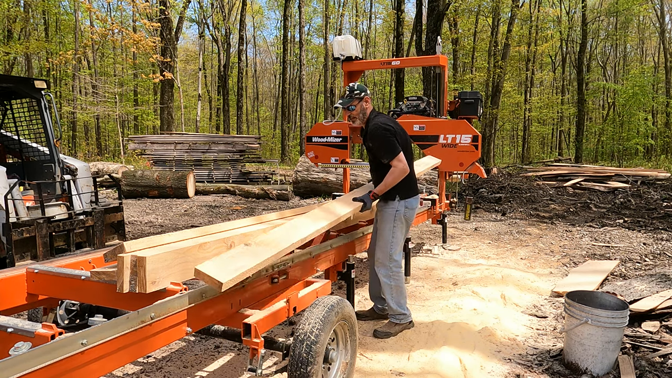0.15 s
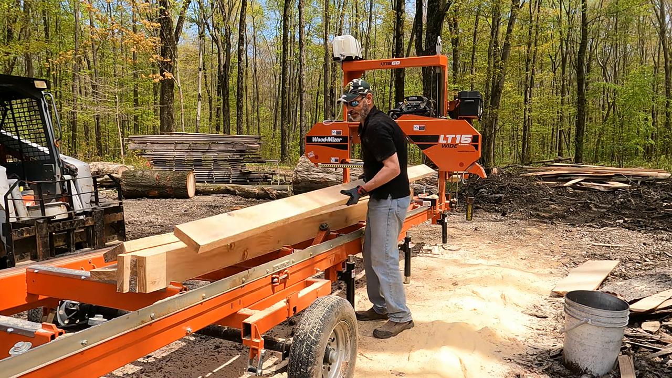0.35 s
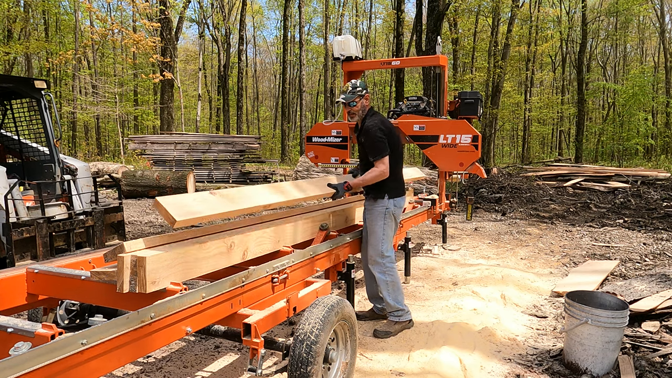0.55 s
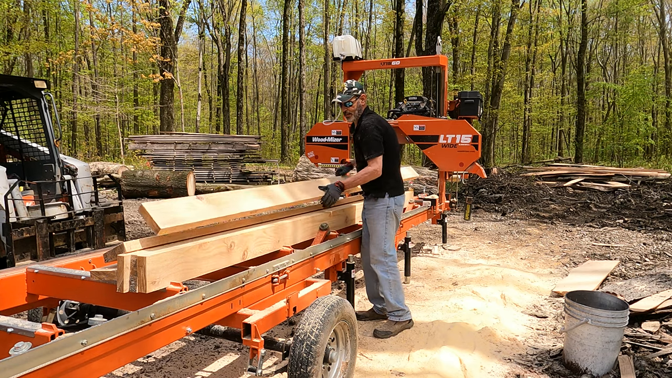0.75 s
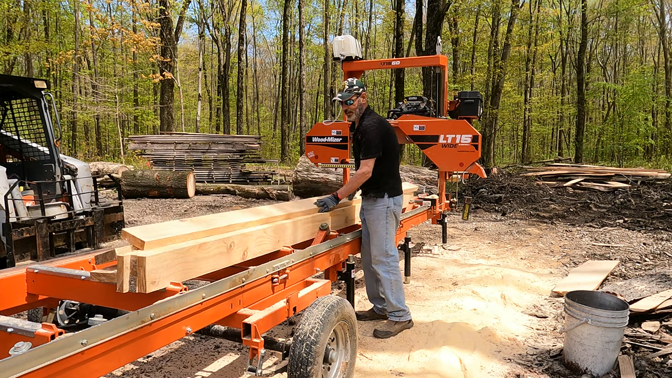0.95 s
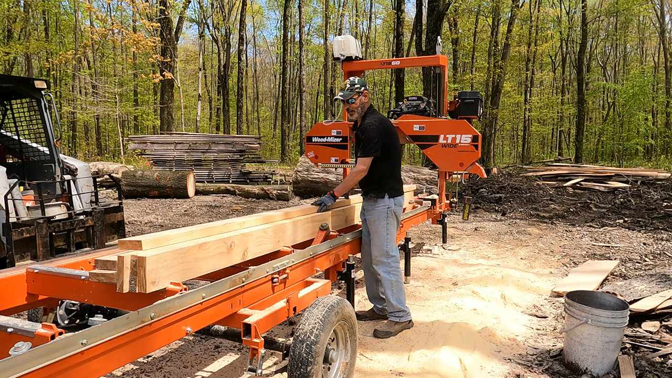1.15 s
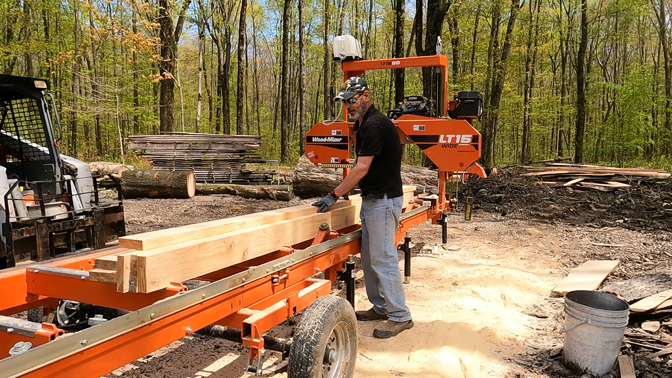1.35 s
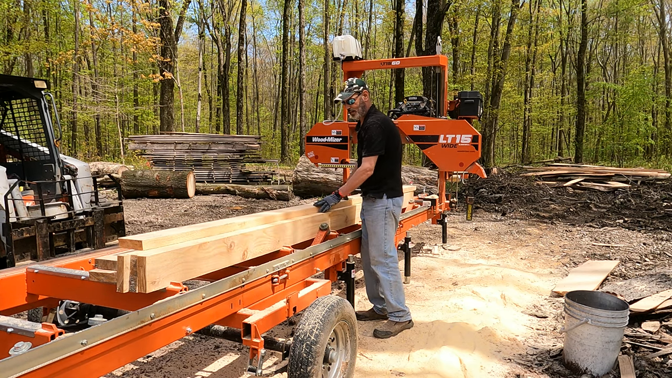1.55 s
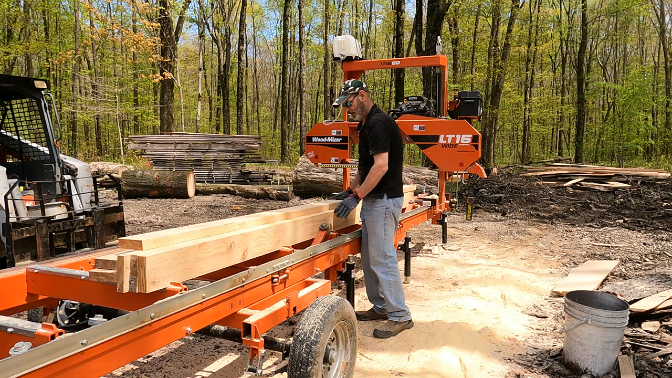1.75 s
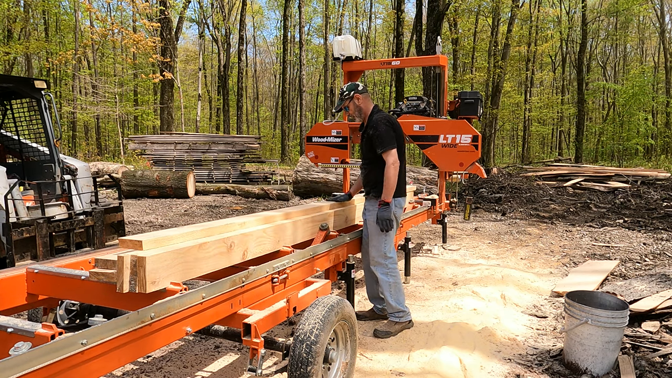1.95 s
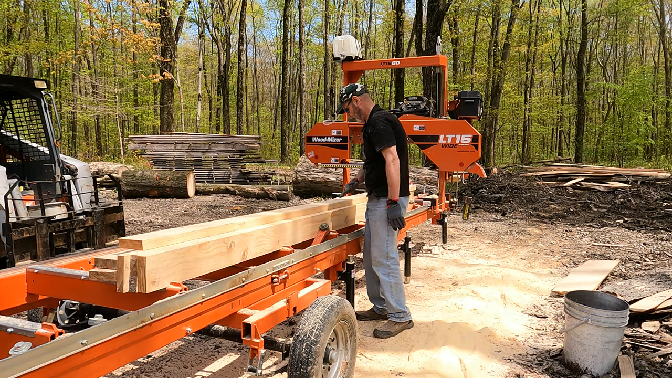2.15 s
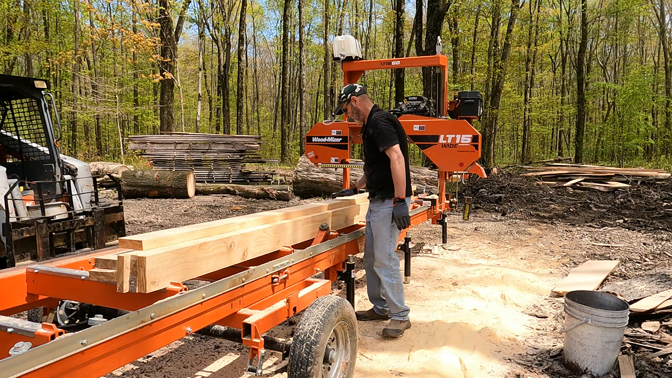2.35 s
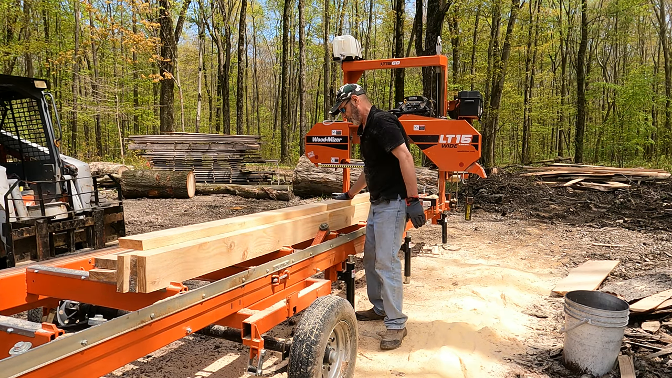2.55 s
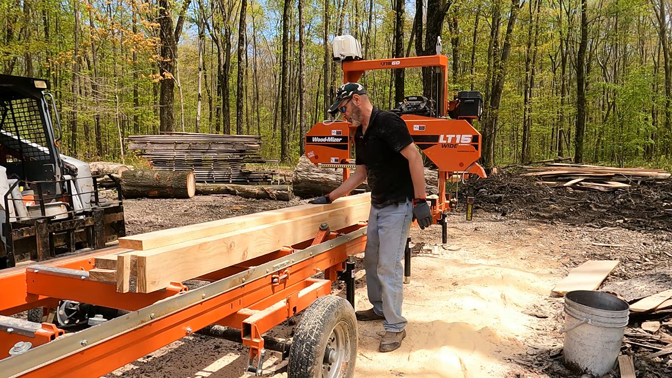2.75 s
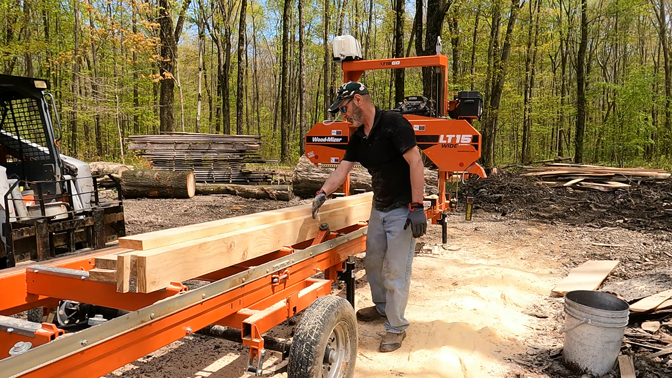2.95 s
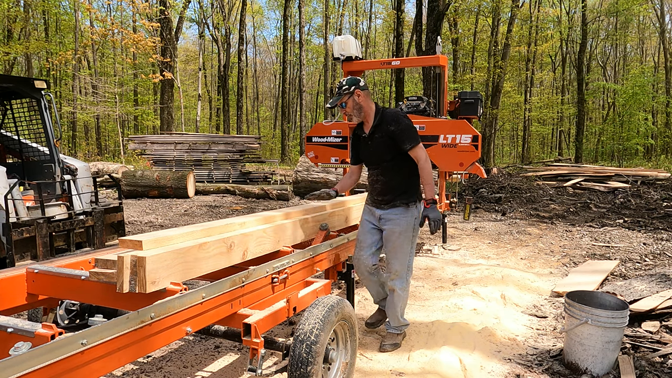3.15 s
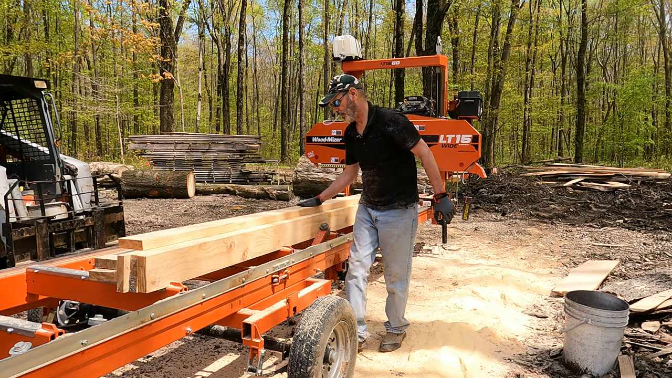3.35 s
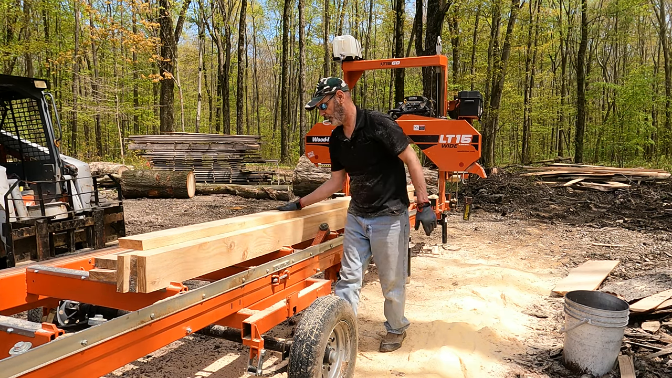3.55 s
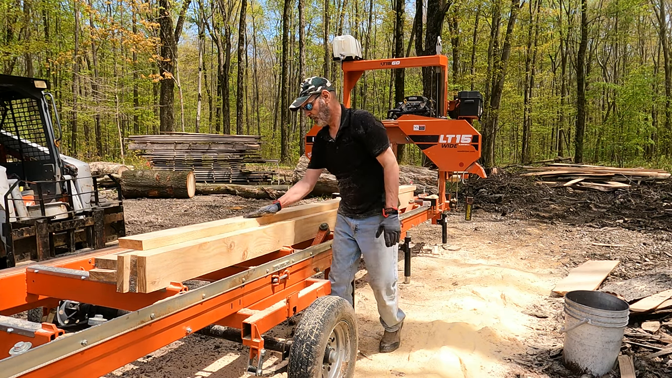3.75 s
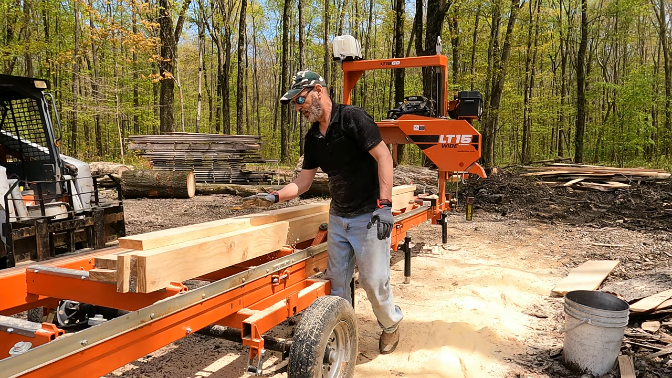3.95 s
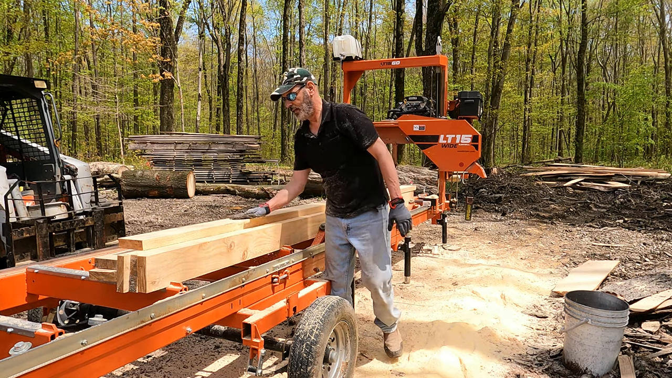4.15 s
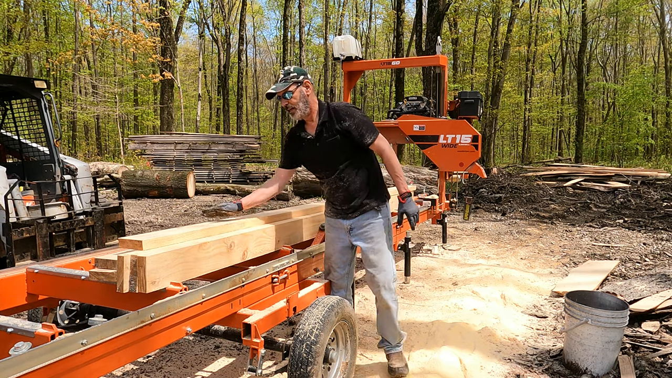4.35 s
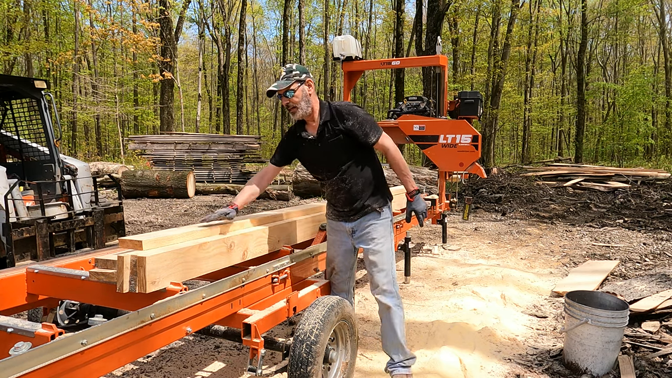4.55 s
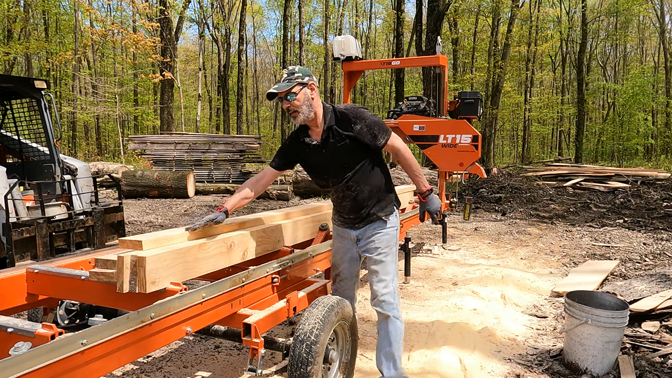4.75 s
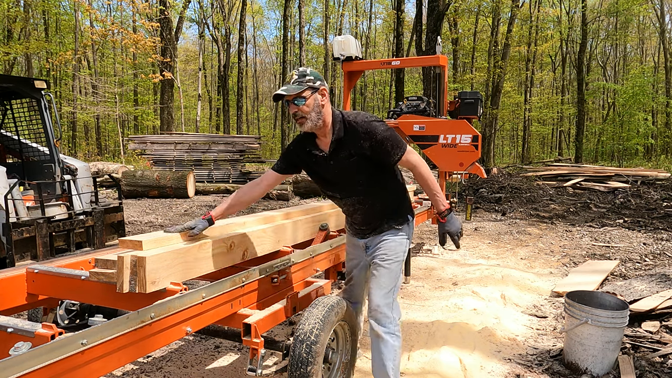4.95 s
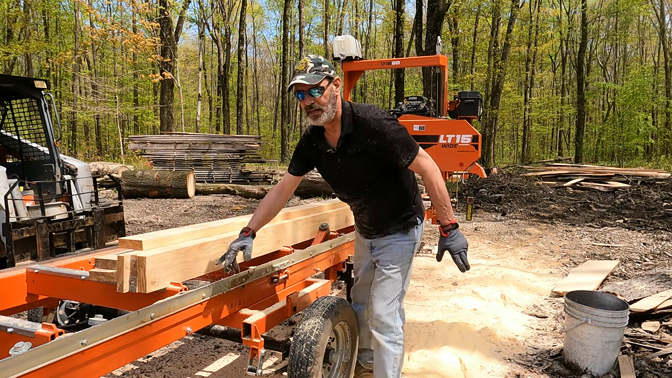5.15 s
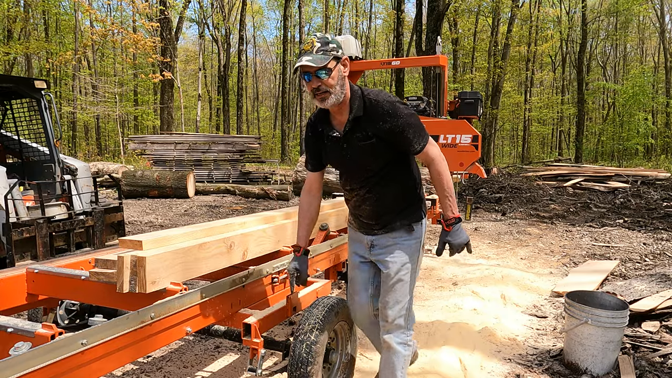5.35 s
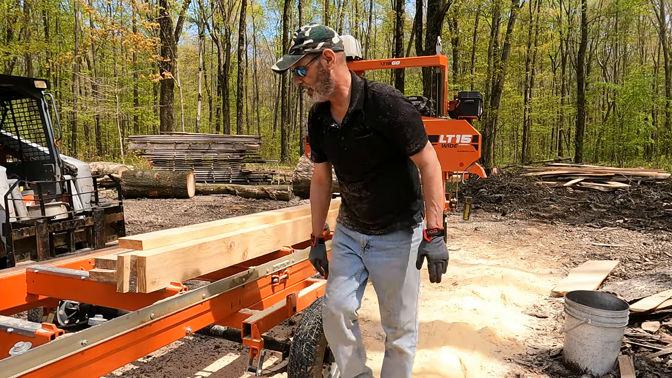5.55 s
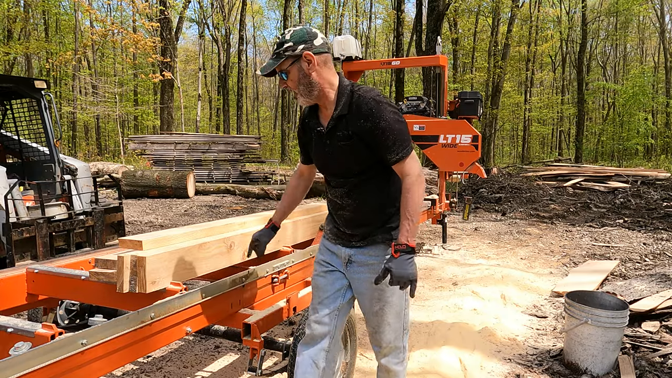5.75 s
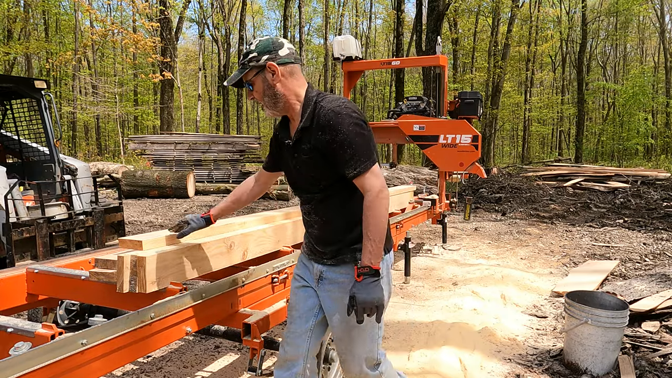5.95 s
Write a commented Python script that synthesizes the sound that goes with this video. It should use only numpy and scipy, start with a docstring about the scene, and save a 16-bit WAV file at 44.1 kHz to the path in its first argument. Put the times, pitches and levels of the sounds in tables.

```python
"""Leaves hiss over a distant rumble and a faint wavering drone, as filtered noise throughout.
A long fresh-sawn board slides through a gloved hand (swelling noise) and drops on a stack on a sawmill bed:
modes ring, wood noise knocks, fittings rattle, trees echo; gain control ducks and recovers slowly.
The glove then sweeps off sawdust in long and short strokes of swelling noise, with a few soft low steps.
Late on, a far tree frog trills once in upward tone slides and the board knocks lightly again."""
import sys
import numpy as np
from scipy import signal
from scipy.fft import rfft, irfft
from scipy.io import wavfile
from scipy.ndimage import uniform_filter1d

SR = 44100
rng = np.random.default_rng(int(sys.argv[2]) if len(sys.argv) > 2 else 0)


def log_audio(samples):
    """Write samples as a 16-bit WAV file to the path given in sys.argv[1]."""
    # one column per channel
    frames = np.atleast_2d(samples).T
    # limit to full scale, then quantise
    limited = np.clip(frames, -1, 1)
    pcm = np.round(limited * 32767).astype(np.int16)
    wavfile.write(sys.argv[1], SR, pcm)


N = 264600
TIME_S = np.arange(N) / SR

# board against stack: start_s, relative_strength_db, lowpass_hz
CONTACTS = [(0.802, -24.5, 810), (0.841, -29.5, 590), (0.929, -5.5, 950), (0.938, -2.5, 1050),
            (0.957, -9.5, 855), (0.9684, -3.5, 5900), (0.9725, 11.5, 750), (0.984, 13, 1485),
            (0.994, -1, 800), (1.007, -1.5, 690), (1.026, 1.5, 750), (1.058, 3, 560), (1.210, -17, 1100),
            (1.273, -7, 890), (1.297, -20, 4800), (1.392, -25, 4000), (4.523, -27.5, 575),
            (5.646, -33, 1500)]
# bending modes of the boards: mode_hz, relative_level_db, t60_s
BOARD_MODES = [(102, -21, .1), (140, -13, .15), (184, -3, .26), (251, -8, .22), (322, -1, .2),
               (395, -9, .12), (420, -5, .16), (487, -3, .15), (520, -8, .14), (576, -6, .22),
               (624, -9, .15), (656, -4, .14), (765, -8, .15), (850, -12, .16), (951, -5, .1),
               (988, 1, .11), (1087, 3, .06), (1195, -8, .1), (1255, -8, .09), (1378, -12, .1),
               (1605, -10, .09)]
# crowded short modes of the wood: band_hz, relative_db_per_hz
WOOD_SPECTRUM = [(40, -34), (100, -14), (200, -7.5), (500, 1.5), (1100, -6.5), (2000, -12.5), (3800, -5.5),
                 (5500, -29.5), (8000, -12.5), (11000, -73), (14000, -50)]
# their decay: band_hz, t60_s
WOOD_T60 = [(100, 0.46), (500, 0.11), (1500, 0.18), (4000, 0.17), (11000, .04)]
# modes of the loose steel fittings: mode_hz, half_width_hz (of each of two cascaded stages), relative_level_db
FITTINGS = [(1600, 220, -25), (1890, 150, 3), (2150, 240, -4), (3540, 110, -12.5), (4000, 110, -16),
            (5260, 97, -22)]
# glove rubbing on the board: first row the board sliding through the hand before it lands, then strokes
# sweeping off sawdust: lift_off_s, swell_s, hold_s, relative_level_db, treble_tilt_db (highs up, lows down),
# palm_hollow_lowest_hz
STROKES = [(0.909, 0.055, 0.035, -58.5, 12.5, 2500), (2.13, 0.13, 0.046, -42, 5, 2400),
           (3.02, 0.41, 0.081, -38, 5.5, 1997), (3.887, 0.21, 0.23, -39.5, 3, 999),
           (4.313, 0.11, 0.051, -43, 5.5, 1900), (4.596, 0.093, 0.025, -42, 5.5, 2000),
           (4.865, 0.06, 0.05, -43, 2.5, 2000), (5.124, 0.065, 0.048, -47, 4.5, 2200),
           (5.362, 0.052, 0.096, -55.5, -4.5, 2200), (5.648, 0.14, 0.004, -46.5, -1.5, 2200)]
# cloth on sawn wood: band_hz, relative_db_per_hz
RUB_SPECTRUM = [(200, -23), (450, 1.5), (800, 2.5), (1400, 2.5), (2200, 1.5), (3400, -1.5), (4800, -9.5),
                (7000, -18), (8500, -30), (10500, -22), (12000, -41), (14000, -54)]
# scuffs of glove and clothes: start_s, relative_level_db, length_s (peak at half)
SCUFFS = [(0.797, -53, 0.0041), (2.525, -53, 0.021), (3.345, -53.5, 0.037), (3.414, -49, 0.026),
          (5.017, -48.5, 0.0096), (5.159, -49, 0.014), (5.284, -56, 0.0104), (5.348, -55, 0.012),
          (5.485, -52.5, 0.018), (5.57, -59, 0.014), (5.638, -51, 0.011)]
# boots on sawdust: start_s, level_db, length_s (peak at half)
STEPS = [(3.1, -50.5, 0.25), (4.52, -41, 0.027), (5.2, -42, 0.015), (5.65, -42.5, 0.024)]
# muffled step: band_hz, relative_db_per_hz
STEP_SPECTRUM = [(40, -37.5), (120, -7.5), (200, -10.5), (350, -25), (700, -53), (2000, -68)]
# echo from yard and trees: band_hz, relative_db_per_hz
FOREST_SPECTRUM = [(60, 14.5), (200, -5.5), (600, -0.5), (1200, -4), (2000, -9), (4000, -2.5), (8000, -8.5),
                   (14000, -39)]
# decay of the trees' answer: band_hz, t60_s
FOREST_T60 = [(100, 0.86), (600, 1.33), (1500, 1.9), (4000, 0.49), (11000, 1.65)]
# leaves and distant rumble: band_hz, relative_db_per_hz
AIR_SPECTRUM = [(20, -39), (35, -23), (55, -9.5), (100, -3.5), (165, -1.5), (230, -6.5), (310, -13.5),
                (500, -13.5), (750, -13.5), (950, -19.5), (1500, -19), (2300, -23), (4000, -35.5),
                (7000, -48), (8500, -58.5), (11000, -54.5), (14000, -76)]

REBOUND_S, REBOUND_LOSS_DB, REBOUND_DULLING = 0.0055, 6.5, 0.63  # second touch: later, softer, duller
LOWEST_HZ = 135  # a narrow board radiates little below this
RATTLE_START_S, RATTLE_DB = 1.032, -34
RATTLE_RISE_S, RATTLE_HOLD_S, RATTLE_FADE_DB_PER_S = 0.055, 0.14, 66  # hold ends this long after the start
LIFT_S, SPEED_POWER, SAG_DB_PER_S = 0.055, 1.48, 13.5  # lift-off time; level against speed; easing pressure
SLOW_DULLING_DB = 3.5  # treble tilt lost as speed nears zero
# palm's hollow: deepest at this share of a rub; rise in octaves per rub length; ceiling of the open hand
CUPPED_AT, CUP_OCTAVES, OPEN_PALM_HZ = 0.62, 3.5, 2500
TRILL_START_S, TRILL_DB = 4.313, -41.5
TRILL_GAP_S, TRILL_SLOWING_S = 0.0455, 0.0013  # first pulse spacing; added to each later one
YARD_T60_S, TREE_RISE_S = 0.24, 0.085
AIR_DB, DRONE_RELATIVE_DB = -46.5, -11.5
RECOVERY_DB_PER_S, CUTOFF_HZ = 6, 14500


def clatter(modes_db=-17.0, crowd_db=16, smack_db=5, smack_top_hz=1700, scatter_db=2,
            grit_db=-20.0, grit_hz=2200, grit_limit_db=-6):
    """Contacts ring the boards: soft, flat landings lack treble, hard edges crack. Gives knock and ring."""
    t, knock, ring = TIME_S[:SR // 2], np.zeros(N), np.zeros(N)
    mode_hz, mode_db, t60_s = np.transpose(BOARD_MODES)
    decays = np.exp(-np.log(1000) * t / t60_s[:, None])
    shapes = np.sin(2 * np.pi * mode_hz[:, None] * t) * decays
    # the sudden stop sends out one sharp pressure pulse
    impulse = (t == 0).astype(float)
    pulse = butter(butter(impulse, smack_top_hz, "low", order=3), 430, "high")
    smack = from_db(smack_db) * pulse
    for start_s, strength_db, lowpass_hz in touches():
        # the place of contact sets each mode's strength and sign
        strengths = from_db(mode_db + scatter_db * rng.standard_normal(len(mode_hz)))
        shares = strengths * rng.choice([-1, 1], len(mode_hz))
        tone = butter(shares @ shapes, lowpass_hz, "low", order=3)
        add(ring, start_s, from_db(strength_db + modes_db) * tone)
        crowd = dying_noise(WOOD_SPECTRUM, WOOD_T60, t)
        # sawn fibres crunch even in soft landings, but no louder once pressed flat
        grit_level_db = grit_db - max(strength_db - grit_limit_db, 0)
        grit = from_db(grit_level_db) * butter(crowd, grit_hz, "high")
        body = butter(smack + crowd, lowpass_hz, "low", order=3)
        add(knock, start_s, from_db(strength_db + crowd_db) * (body + grit))
    return butter([knock, ring], LOWEST_HZ, "high", order=3)


def touches():
    """The springy board touches again after each contact: start_s, strength_db, lowpass_hz."""
    return [(start_s + k * REBOUND_S, db - k * REBOUND_LOSS_DB, hz * REBOUND_DULLING ** k)
            for start_s, db, hz in CONTACTS for k in range(2)]


def rattle(ticks_per_s=1200, uneven_db=1.5):
    """The blow sets the steel bed's clamps chattering: random ticks excite their modes."""
    ticks = (rng.random(N) < ticks_per_s / SR) * rng.standard_normal(N)
    ringing = np.zeros(N)
    for hz, half_width_hz, db in FITTINGS:
        stage = resonance(ticks, hz, 2 * half_width_hz)
        ringing += from_db(db) * resonance(stage, hz, 2 * half_width_hz)
    age_s = TIME_S - RATTLE_START_S
    fade_db = RATTLE_FADE_DB_PER_S * np.maximum(age_s - RATTLE_HOLD_S, 0)
    level_db = RATTLE_DB - fade_db + uneven_db * drift(20)
    return rms_one(ringing) * np.clip(age_s / RATTLE_RISE_S, 0, 1) * from_db(level_db)


def glove(rub_db=2, grains_per_s=3000, grain_share=0.37, catch_db=1.3, hinge_hz=2500, scuff_db=2, palm_db=-7.5):
    """Cloth and sawn fibres rub: fine hiss with sawdust grains, catching a little as it goes."""
    grains = rms_one((rng.random(N) < grains_per_s / SR) * rng.standard_normal(N))
    friction = coloured(rng.standard_normal(N) + grain_share * grains, RUB_SPECTRUM)
    level, tilt_db, palm_hz = hand()
    low = butter(friction, hinge_hz, "low", order=1)
    high = friction - low
    hollow = from_db(palm_db - tilt_db / 2) * palm(palm_hz)
    rub = low * from_db(-tilt_db) + high * from_db(tilt_db) + hollow
    drag = level * from_db(rub_db + catch_db * drift(120))
    return drag * rub + from_db(scuff_db) * puffs(SCUFFS) * friction


def hand():
    """Each rub speeds up, eases and lifts off; faster is louder and brighter. Gives level, tilt_db, palm_hz."""
    level, tilt_db, palm_hz = np.zeros((3, N))
    for lift_s, swell_s, hold_s, db, rub_tilt_db, hollow_hz in STROKES:
        length_s = swell_s + hold_s + LIFT_S
        age_s = TIME_S - (lift_s - hold_s - swell_s)
        on = (age_s > 0) & (age_s < length_s)
        t = age_s[on]
        speed = np.clip(np.minimum(t / swell_s, (length_s - t) / LIFT_S), 0, 1)
        sag_db = SAG_DB_PER_S * np.maximum(t - swell_s, 0)
        level[on] = from_db(db - sag_db) * speed ** SPEED_POWER
        tilt_db[on] = rub_tilt_db - SLOW_DULLING_DB * (1 - speed)
        rise_octaves = CUP_OCTAVES * np.abs(t / length_s - CUPPED_AT)
        palm_hz[on] = np.minimum(hollow_hz * 2 ** rise_octaves, OPEN_PALM_HZ)
    return level, tilt_db, palm_hz


def palm(centre_hz, half_width_hz=380):
    """Noise in a broad resonance that glides as the hand opens and closes."""
    phase = 2 * np.pi * np.cumsum(centre_hz) / SR
    a, b = butter(rng.standard_normal((2, N)), half_width_hz, "low")
    return rms_one(a * np.cos(phase) + b * np.sin(phase))


def boots():
    """Sawdust muffles each step to a low thud."""
    return puffs(STEPS) * coloured(rng.standard_normal(N), STEP_SPECTRUM)


def frog(start_hz=880, end_hz=1100, pulse_s=0.0254, octave_db=-9, rough=0.92, count=9):
    """A trill that slows a little; each pulse slides upward and carries its octave."""
    t, out = TIME_S[:int(pulse_s * SR)], np.zeros(N)
    share = t / pulse_s
    phase = 2 * np.pi * np.cumsum(start_hz + (end_hz - start_hz) * share) / SR
    tone = np.sin(phase) * share + from_db(octave_db) * np.sin(2 * phase)
    pulse = np.sqrt(np.sin(np.pi * share)) * tone
    for k in range(count):
        delay_s = k * TRILL_GAP_S + TRILL_SLOWING_S * k * (k - 1) / 2
        add(out, TRILL_START_S + delay_s, pulse)
    return from_db(TRILL_DB) * out * (1 + rough * drift(300))


def forest(x, yard_db=-17, trees_db=-22):
    """Machines and log piles scatter the sound at once; the trunks answer later and longer."""
    t = TIME_S[:2 * SR]
    yard_t60 = [(100, YARD_T60_S), (10000, YARD_T60_S)]
    yard = dying_noise(FOREST_SPECTRUM, yard_t60, t) * np.minimum(t / 0.0028, 1)
    trees = dying_noise(FOREST_SPECTRUM, FOREST_T60, t) * np.minimum(t / TREE_RISE_S, 1) ** 4
    trees = trees / np.sqrt(np.sum(trees ** 2))
    return signal.fftconvolve(x, from_db(yard_db) * yard + from_db(trees_db) * trees)[:N]


def air(drone_hz=645, stage_width_hz=35):
    """Leaves and far traffic as steady noise; narrow resonant noise makes a faint wavering drone."""
    bed = coloured(rng.standard_normal(N), AIR_SPECTRUM)
    stage = resonance(rng.standard_normal(N), drone_hz, stage_width_hz)
    drone = rms_one(resonance(stage, drone_hz, stage_width_hz))
    return from_db(AIR_DB) * (bed + from_db(DRONE_RELATIVE_DB) * drone)


def from_db(db):
    """Decibels to amplitude."""
    return 10 ** (np.asarray(db) / 20)


def rms_one(x):
    """Scale to rms 1."""
    return x / np.sqrt(np.mean(x ** 2) + 1e-20)


def at_hz(points, hz):
    """Read a table on a log-frequency axis."""
    table_hz, value = np.transpose(points)
    return np.interp(np.log(np.maximum(hz, 1)), np.log(table_hz), value)


def butter(x, hz, kind, order=2):
    """Butterworth low-pass or high-pass."""
    sos = signal.butter(order, np.clip(hz, 10, .45 * SR), kind, fs=SR, output="sos")
    return signal.sosfilt(sos, x)


def coloured(x, spectrum):
    """Give a steady sound a spectrum; rms 1."""
    gain = from_db(at_hz(spectrum, np.fft.rfftfreq(len(x), 1 / SR)))
    return rms_one(irfft(rfft(x) * gain, len(x)))


def drift(knots_per_s):
    """Random values joined by straight lines."""
    knots = rng.standard_normal(4096)
    return np.interp(TIME_S * knots_per_s, np.arange(len(knots)), knots)


def resonance(x, hz, width_hz):
    """One resonant mode."""
    return signal.lfilter(*signal.iirpeak(hz, hz / width_hz, fs=SR), x)


def dying_noise(spectrum, t60s, t):
    """Half-octave bands of noise that each die at their own pace; energy 1."""
    edges_hz, out = 40 * 2 ** np.arange(0, 9, .5), 0
    for low_hz, high_hz in zip(edges_hz, edges_hz[1:]):
        hz = np.sqrt(low_hz * high_hz)
        level_db = at_hz(spectrum, hz) - 60 * t / at_hz(t60s, hz)
        burst = rng.standard_normal(len(t)) * from_db(level_db)
        sos = signal.butter(2, [low_hz, high_hz], "band", fs=SR, output="sos")
        out = out + signal.sosfilt(sos, burst)
    return out / np.sqrt(np.sum(out ** 2))


def add(out, start_s, sound):
    """Mix a sound in at its start time."""
    start = round(start_s * SR)
    out[start:start + len(sound)] += sound[:N - start]


def puffs(rows):
    """Envelope of soft contacts: each peaks at half its length, then fades."""
    out = np.zeros(N)
    for start_s, level_db, length_s in rows:
        age = np.maximum(TIME_S - start_s, 0) / (length_s / 2)
        out += from_db(level_db) * age * np.exp(1 - age)
    return out


def scene(ring_carry_db=-9, frog_echo_db=4):
    """Work at the mill with its echoes, over the steady sound of the clearing."""
    knock, ring = clatter()
    sharp, trill = knock + rattle() + glove(), frog()
    # the ring carries less far than the knock; the far frog has more echo than the work nearby
    echoes = forest(sharp + from_db(ring_carry_db) * ring + from_db(frog_echo_db) * trill)
    return (sharp + ring + trill + echoes + boots() + air())[None]


def gain_control(x, threshold_db=-9):
    """Gain drops almost at once above the threshold and creeps back."""
    level_db = 10 * np.log10(np.maximum(uniform_filter1d(x ** 2, size=500), 1e-12))
    over_db = np.maximum(level_db - threshold_db, 0)
    recovered_db = RECOVERY_DB_PER_S * TIME_S
    held_db = np.maximum.accumulate(over_db + recovered_db, axis=-1) - recovered_db
    return x * from_db(-uniform_filter1d(held_db, size=100))


def record(dry, notch_hz=9050, notch_width_hz=1600):
    """The microphone port cuts a treble notch; then gain control, rounded peaks and the top cut."""
    x = signal.lfilter(*signal.iirnotch(notch_hz, notch_hz / notch_width_hz, fs=SR), dry)
    x = gain_control(x)
    x = x / (1 + x ** 8) ** (1 / 8)
    top_cut = signal.cheby2(14, 60, CUTOFF_HZ + 700, fs=SR, output="sos")  # 60 dB down at the edge
    return signal.sosfilt(top_cut, x)


dry = scene()
out = record(dry)
log_audio(out)
```